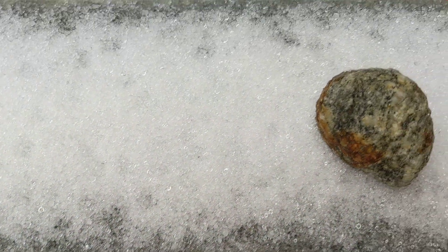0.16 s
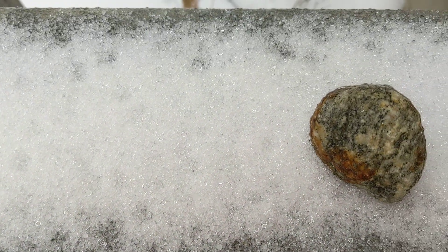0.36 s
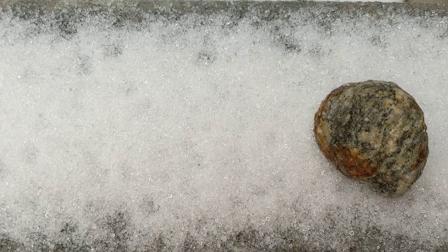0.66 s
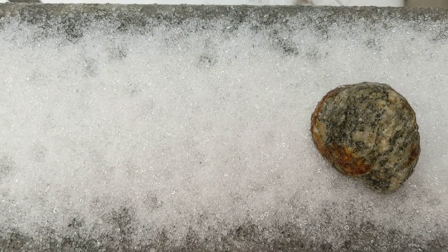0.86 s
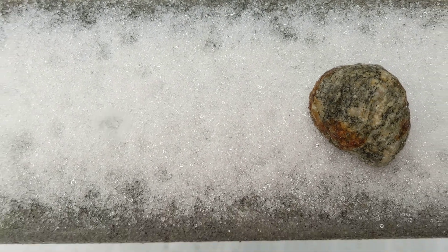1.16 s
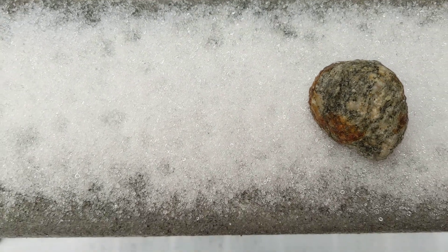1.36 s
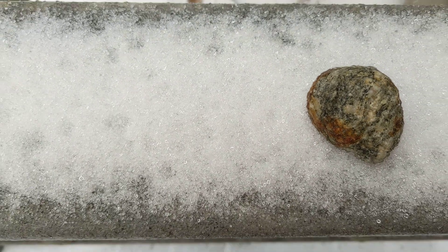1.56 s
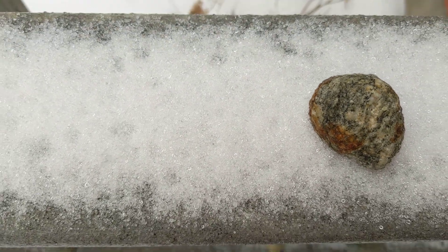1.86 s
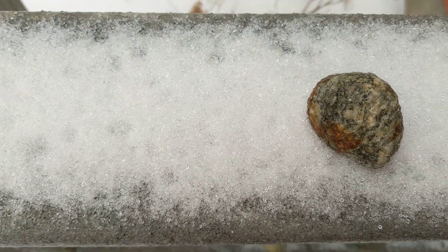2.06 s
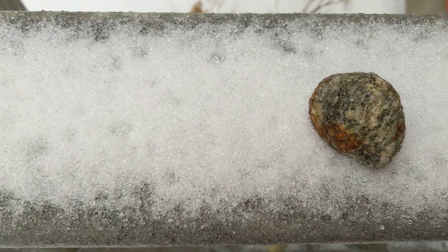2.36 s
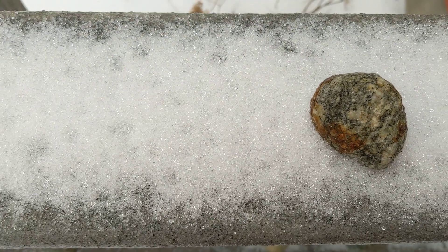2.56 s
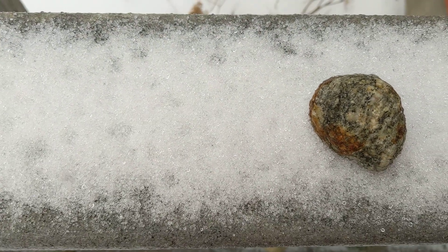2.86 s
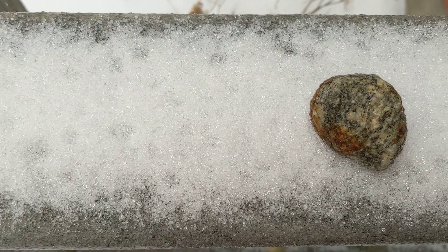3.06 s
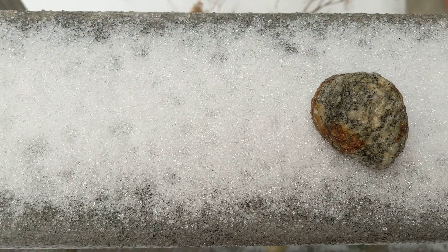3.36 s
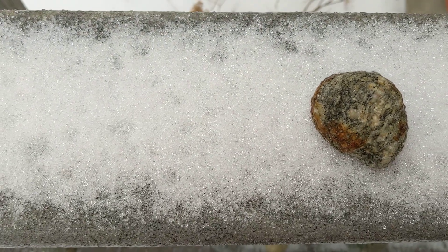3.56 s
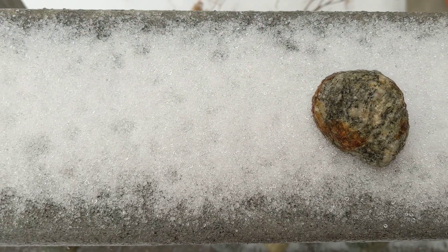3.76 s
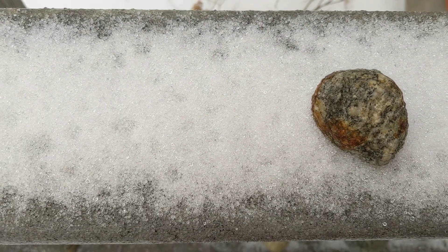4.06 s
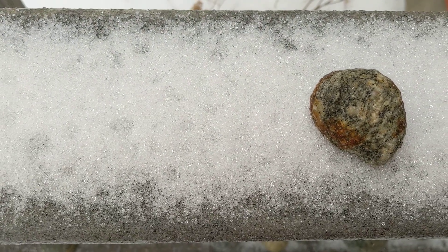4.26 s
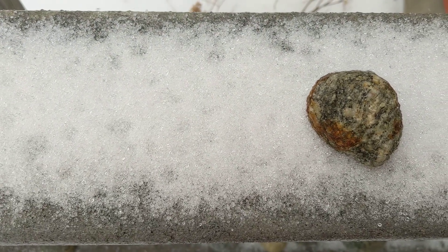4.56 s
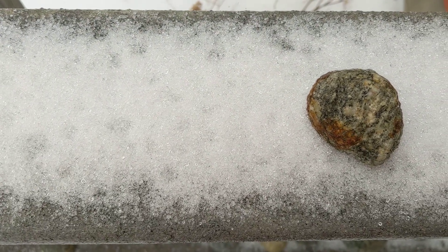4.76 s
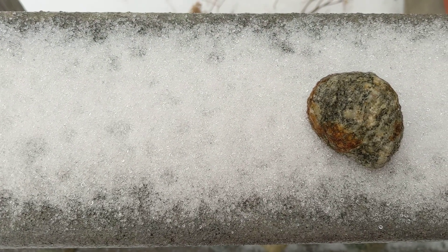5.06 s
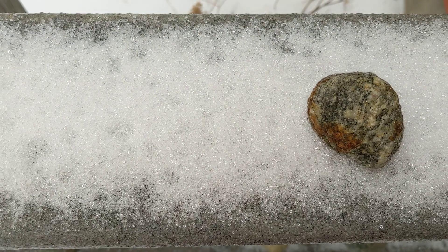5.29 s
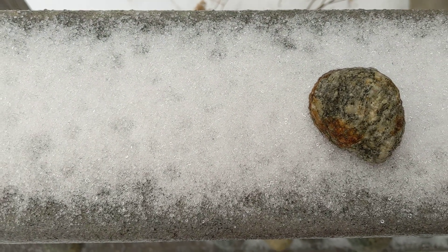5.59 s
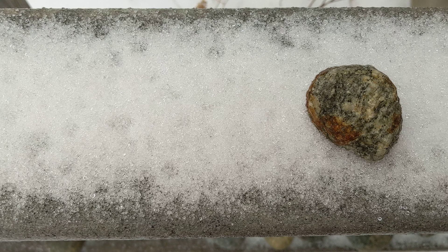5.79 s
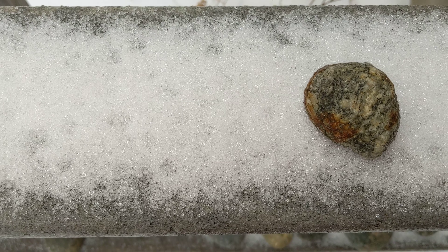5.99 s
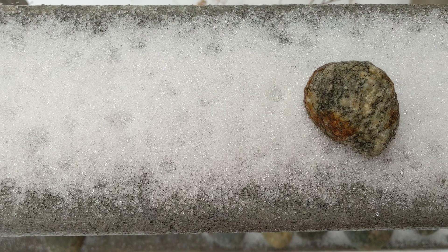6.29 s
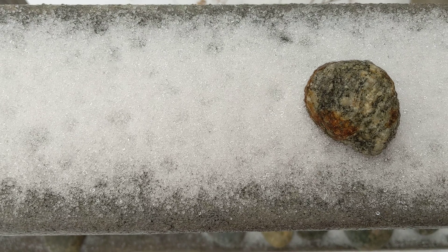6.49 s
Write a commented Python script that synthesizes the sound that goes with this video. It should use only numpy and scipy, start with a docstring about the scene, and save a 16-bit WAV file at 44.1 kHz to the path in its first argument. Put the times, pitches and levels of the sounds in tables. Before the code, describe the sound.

A soft, high hiss of ice pellets pattering on crusted snow runs throughout, outdoors among trees. Crisp clicks and small knocks stand out as pellets hit the microphone, thickest early on, when several also thump. A few tap dryly on twigs. Underneath, far traffic rumbles quietly and an engine's low hum slowly grows, joined late by soft puffs of wind.

```python
"""Sleet falls in snowy woods: countless ice pellets hiss and tick on the crust, and a few tap twigs.
Some strike the camera itself: they click in its microphone ports (the small sound holes), knock its
case and, when heavy, push the diaphragms (the thin skins that sense sound) with a dull thump.
A far engine draws nearer and hums over the rumble of a road; light air stirs at the microphone."""
import sys
import numpy as np
from scipy.fft import rfft, irfft, next_fast_len
from scipy.io import wavfile
from scipy.ndimage import map_coordinates

SR = 44100
rng = np.random.default_rng(int(sys.argv[2]) if len(sys.argv) > 2 else 0)


def transcribe(signal):
    """Save signal, clipped to [-1, 1], as a 16-bit WAV file at the path in sys.argv[1]."""
    frames = np.atleast_2d(signal).T
    limited = np.clip(frames, -1, 1)
    pcm = np.round(limited * 32767).astype(np.int16)
    wavfile.write(sys.argv[1], SR, pcm)


N = 292383
TOP_HZ = 15780  # the highest pitch the camera picks up


# tone of the sleet's hiss: f/Hz, relative level/dB
HISS_TONE = [(500, -8), (1100, -8.5), (1900, -9), (2900, -7.5), (4800, -9), (6600, -5.5), (9500, -1),
             (11000, 0.5), (12800, -4.5), (14300, 1.5), (15500, 0.5)]
# pitches where the ports boost the hiss: f/Hz, width/Hz, left boost/dB, right boost/dB
HISS_BOOSTS = [(1224, 165, 2.5, 3.5), (2280, 680, 6, 6.5), (3293, 480, 7.5, 6.5), (4055, 990, 6.5, 7.5),
               (5700, 990, 10, 8.5), (7490, 800, 6, 6), (9560, 830, 5.5, 6.5), (11850, 380, 10, 1.5)]

def sleet(start_db=-45, thicken_s=5.4, thicken_db_per_s=1.2):
    """Far pellets blur into hiss; nearer ones tick in little clusters. Late on, the sleet thickens."""
    def tone_db(f):
        boosts = (np.array([[left], [right]]) * abs(resonance(f, hz, width)) ** 2
                  for hz, width, left, right in HISS_BOOSTS)
        return along(HISS_TONE, f) + sum(boosts)

    level_db = start_db + thicken_db_per_s * np.maximum(seconds() - thicken_s, 0) + 0.79 * wobble(9)
    far = rng.standard_normal((2, N)) * amp(.5 * wobble(30))
    near = patter(per_s=900, scatter_db=4.5, cap_db=13, pitch_hz=7120, fade_cycles=1.4)
    near *= amp(2.55 * wobble(45))
    return amp(level_db) * spread(far + amp(-9) * near, tone_db)


def patter(per_s, scatter_db, cap_db, pitch_hz, fade_cycles):
    """Pellets tick on the crust, each with its own pitch and direction: many small, a few large."""
    when, size, side, tone = rng.random((int(per_s * N / SR), 4)).T[..., None]
    t = np.arange(SR // 400) / SR
    hz = np.minimum(pitch_hz * 2 ** (1.91 * (tone - .5)), TOP_HZ)
    strength = amp(np.minimum(-scatter_db * np.log(1 - size), cap_db))
    ticks = strength * np.sqrt(hz) * np.exp(-hz * t / fade_cycles) * np.sin(2 * np.pi * hz * t)
    samples = (when * N).astype(int) + np.arange(len(t))
    gains = np.cos(np.pi * side), np.sin(np.pi * side)
    pair = [np.bincount(samples.ravel(), (ticks * gain).ravel(), N)[:N] for gain in gains]
    return unit(np.array(pair))


# clear hits on the camera: t/s, left level/dB, right level/dB, treble over mid/dB, knock/dB, ping/dB
CAMERA_HITS = [(0.0704, -23, -46, 7, -44, -2), (0.355, -28.5, -45, 7, -39.5, -9),
               (0.384, -22.5, -52, 9, -43.5, 0), (0.7965, -13, -37, 1.5, -47, 21),
               (0.854, -41, -52, 3, -41, -4), (1.28, -28, -40, 11, -63, -5), (1.399, -45, -29, 10, -46, -6),
               (1.4613, -20, -25, 3.5, -26.5, -21), (1.5684, -9, -29, -9.5, -27.5, 19),
               (1.675, -27.5, -53, 9, -48, -2), (1.9037, -13, -31, 11, -35, -3.5),
               (1.945, -37, -31, 6, -48, -9), (1.956, -25, -44, 7, -60, -7),
               (2.036, -26.5, -43, -2, -55, 6), (2.338, -26.5, -46, 11, -56, 0),
               (2.4143, -23.5, -14, -0.5, -28, -14), (2.5421, -22.5, -16.5, -6, -26.5, -5),
               (2.6848, -29, -29.5, 4, -36, -14), (3.1823, -14.5, -50, 6.5, -47, -7),
               (3.446, -26.5, -48, 8, -54, -4), (4.266, -51, -29, 10, -54, -6),
               (4.384, -45, -33, 14, -59, -6), (5.317, -21.5, -50, 5.5, -47, 0),
               (5.455, -24, -37, 6, -57, 0), (5.4932, -17.5, -45, 2, -52, 28),
               (5.547, -18.5, -49, 11.5, -46, -3), (6.219, -22.5, -47, 11, -51, -1),
               (6.295, -29.5, -48, 8, -48, 2), (6.481, -31, -47, 7, -40.5, -6)]
# pitches at which the air in the ports rings: f/Hz, width/Hz, relative level/dB
PORT_RINGS = [(2150, 2600, -10), (3560, 890, -6.5), (7310, 500, -1), (9520, 540, -6), (11370, 420, -4.5),
              (14300, 840, -8.5)]
# port pitches that ping under a head-on hit: f/Hz, width/Hz, relative level/dB
PORT_PINGS = [(5660, 470, 9), (3680, 420, -42)]
# pitches at which the case rings: f/Hz, width/Hz, relative level/dB
CASE_RINGS = [(460, 300, -1.5), (784, 410, 10.5), (1600, 220, -1)]

def strikes(hits):
    """Each pellet cracks into the ports, sets the air in them ringing and knocks the case."""
    out, t = np.zeros((2, N)), np.arange(SR // 64) / SR
    f = np.fft.rfftfreq(len(t), 1 / SR)
    treble_share = 1 / (1 + (8500 / (f + 1)) ** 8)
    lead = SR // 1000  # samples of room before the click
    for s, left_db, right_db, treble_db, knock_db, ping_db in hits:
        for channel, db in enumerate((left_db, right_db)):
            # one sharp contact, then the grain of ice crumbles
            contact = (t == 0) + .1 * amp(-60 * t / .004) * rng.standard_normal(len(t))
            port = sum(amp(level + rng.standard_normal()) * resonance(f, hz, width)
                       for hz, width, level in PORT_RINGS)
            ping = sum(amp(level + ping_db) * resonance(f, hz, width) for hz, width, level in PORT_PINGS)
            direct = amp(-24) * resonance(f, 8900, 8000) ** 2
            spectrum = rfft(contact) * (port + ping + direct)
            low, high = spectrum * (1 - treble_share), spectrum * treble_share
            balanced = low / np.linalg.norm(low) + amp(treble_db) * high / np.linalg.norm(high)
            click = unit_burst(np.roll(irfft(balanced, len(t)), lead))
            add(out[channel], s - lead / SR, amp(db - 0.88) * click)
        # heavier pellets knock lower
        pitch = np.exp(0.081 * rng.standard_normal() - 0.0047 * (knock_db + 38.0))
        case = sum((-1) ** k * amp(level) * resonance(f, hz * pitch, width)
                   for k, (hz, width, level) in enumerate(CASE_RINGS))
        knock = unit_burst(irfft(-case * resonance(f, 770, 1050), len(t)))
        # the case rocks, so the two ports hear it a moment apart
        add(out[0], s, amp(knock_db + 5.5) * knock)
        add(out[1], s - .0002, amp(knock_db - 12.0) * knock)
    return out


# a typical glancing hit: left level/dB, right level/dB, treble over mid/dB, knock/dB, ping/dB
TYPICAL_GRAZE = (-38, -39, 8.5, -55.5, -4)

def grazes(per_s=3, scatter_db=4):
    """Small pellets brush the camera at random moments, making faint clicks that are never quite alike."""
    count = round(per_s * N / SR)
    when = rng.random(count) * N / SR
    levels = TYPICAL_GRAZE + scatter_db * rng.standard_normal((count, len(TYPICAL_GRAZE)))
    return strikes(np.column_stack([when, levels]))


# heavy pellets jolt the air in the ports: t/s, pressure step, first shove (both plain signed factors)
AIR_JOLTS = [(1.46, -0.14, -0.31), (1.5678, 0.1, 0.14), (1.905, -0.024, -0.053), (2.414, 0.41, 0.24),
             (2.6844, .025, 0.1)]

def thumps(swing_hz=6.47, slowing_s=0.22, leak_s=0.063):
    """A jump in pressure pushes the diaphragms; they swing back, ever slower, as it leaks away."""
    out, t = np.zeros((2, N)), np.arange(SR // 2) / SR
    rise = 1 - 0.79 * np.exp(-t / 0.012) - 0.36 * np.exp(-t / 0.00041)
    swing = rise * np.exp(-t / leak_s) * np.cos(2 * np.pi * swing_hz * t / (1 + t / slowing_s))
    # the jolt first shoves one diaphragm in and the other out
    shove = t / .0003 * np.exp(1 - t / .0003)
    for s, step, push in AIR_JOLTS:
        add(out, s, step * swing * amp([[-1.6], [2.2]]))
        add(out, s - .0005, push * shove * np.array([[.55], [-.8]]))
    return out


# pellets on nearby twigs and dry leaves: t/s, level/dB, f/Hz, time to fade by 60 dB/s
TWIG_TAPS = [(.253, -43, 1640, 0.1), (.702, -41.5, 1940, 0.038), (0.862, -46.5, 1770, 0.033),
             (6.426, -35, 2750, 0.077), (6.427, -18.5, 7240, 0.021)]

def taps():
    """A pellet on a twig or leaf makes a short, dry burst of noise around one pitch."""
    out, t = np.zeros((2, N)), np.arange(SR // 8) / SR
    rise = 1 - np.exp(-t / 0.00083)
    for s, db, hz, fade_s in TWIG_TAPS:
        noise = rng.standard_normal((2, len(t)))
        rustle = unit(filtered(noise, lambda f: resonance(f, hz, hz) ** 2))
        add(out, s, rustle * rise * amp(db - 60 * t / fade_s) * amp([[2.5], [-1.5]]))
    return out


# the engine's hum, then its overtones: multiple of the firing rate, relative level/dB
ENGINE_TONES = [(1, 2), (2, -17.5), (3, -22.5), (4, -23), (5, -26)]

def engine(start_hz=73.6, climb_hz_per_s=0.33, nearest_s=4.12, eased_s=6.3, load_s=5.4):
    """A far engine's firing blurs into a wavering hum; it nears, speeds up a little, then works harder."""
    t = seconds()
    hum_db = np.interp(t, [0, nearest_s, eased_s], [-61.5, -44.5, -46.5])
    overtones_db = -63.5 + 6.5 * np.maximum(t - load_s, 0)  # they swell once it pulls under load
    firing_hz = (start_hz + climb_hz_per_s * t) * (1 + .005 * wobble(7))
    phase = 2 * np.pi * np.cumsum(firing_hz) / SR
    hum, *overtones = [amp(db + 1.9 * wobble(8.7)) * np.sin(round(k) * phase) for k, db in ENGINE_TONES]
    return amp(hum_db) * unit(hum) + amp(overtones_db) * unit(sum(overtones))


# tone of the road's rumble: f/Hz, relative level/dB
RUMBLE_TONE = [(40, -0.5), (85, -2), (120, -6.5), (180, -5), (260, -8), (400, -17.5), (900, -22),
               (2000, -60)]
# tone of the tyres' roar: f/Hz, relative level/dB
TYRE_TONE = [(120, -12), (240, -3), (370, -0.5), (560, -3.5), (800, -8.5), (1050, -12), (1250, -12.5),
             (1800, -21), (3000, -40)]
# vehicles going by: t/s when nearest, level/dB, time to fall to half power/s
VEHICLES = [(.2, -57.5, 0.1), (5.7, -54.5, 1.52)]

def road(rumble_db=-57, far_tyres_db=-61):
    """Distant traffic rumbles evenly; each passing vehicle's tyres roar louder as it comes closer."""
    passing_power = sum(amp(db) ** 2 / (1 + ((seconds() - s) / width) ** 2) for s, db, width in VEHICLES)
    tyre_gain = np.sqrt(amp(far_tyres_db) ** 2 + passing_power) * amp(wobble(4.3))
    rumble = spread(rng.standard_normal((2, N)), lambda f: along(RUMBLE_TONE, f))
    roar = spread(rng.standard_normal((2, N)), lambda f: along(TYRE_TONE, f))
    return amp(rumble_db + 0.97 * wobble(2.09)) * rumble + tyre_gain * roar


# tone of air moving past the ports: f/Hz, relative level/dB
AIR_TONE = [(8, -16), (20, -9), (45, -1), (70, 0), (120, -22.5), (300, -52)]
# soft puffs of air: t/s, peak level/dB
AIR_PUFFS = [(5.5, -42.5), (5.6, -46), (6.28, -40.5), (6.6, -49)]

def breeze(start_db=-60.5, grow_db_per_s=2, rise_s=0.036, fall_s=0.052):
    """A light, growing draught rumbles at the microphone; soft puffs rise quickly and die away."""
    t = seconds()
    draught = amp(start_db + grow_db_per_s * t)
    puffs = sum(amp(db) * np.exp(-np.maximum((s - t) / rise_s, (t - s) / fall_s)) for s, db in AIR_PUFFS)
    flow = (draught + puffs) * amp(3.4 * wobble(13))
    return flow * spread(rng.standard_normal((2, N)), lambda f: along(AIR_TONE, f))


# how much louder the left side is than the right: f/Hz, level/dB
LEFT_LEAN = [(100, 2), (250, 2), (500, 3.5), (1800, 2.5), (5000, 2.5), (9500, 3.5), (15000, 5.5)]
# how alike the two sides are: f/Hz, likeness (0 unrelated, 1 the same)
SIDE_LIKENESS = [(60, 0.97), (150, 0.9), (270, 0.68), (450, 0.094), (1200, 0.13), (15000, 0)]

def spread(pair, tone_db):
    """Turn two unrelated signals into stereo sound of strength 1 and a given tone, alike in the bass."""
    angle = lambda f: np.arccos(np.clip(along(SIDE_LIKENESS, f), -1, 1)) / 2
    mid, side = filtered(pair, lambda f: np.array([np.cos(angle(f)), np.sin(angle(f))]))
    stereo = np.array([mid + side, mid - side])
    lean_db = lambda f: along(LEFT_LEAN, f) * np.array([[.5], [-.5]])
    return unit(filtered(stereo, lambda f: amp(tone_db(f) + lean_db(f))))


def seconds():
    """The time of every sample."""
    return np.arange(N) / SR


def amp(db):
    """Turn decibels into a factor to multiply by."""
    return 10 ** (np.asarray(db) / 20)


def unit(x):
    """Scale a sound to an average strength (rms) of 1."""
    return x / np.sqrt(np.mean(x ** 2) + 1e-20)


def unit_burst(x):
    """Scale a short sound to the energy of one millisecond at strength 1."""
    return x / np.sqrt(np.sum(x ** 2) / (SR / 1000))


def along(points, hz):
    """Read between the rows of a (f/Hz, value) table, on a log frequency scale."""
    f, values = np.transpose(points)
    return np.interp(np.log(hz + 1), np.log(f + 1), values)


def wobble(per_s):
    """A smooth curve through per_s random points a second."""
    points = rng.standard_normal(int(N * per_s / SR) + 4)
    return map_coordinates(points, [np.arange(N) * per_s / SR])


def filtered(x, response):
    """Multiply each frequency f in a sound by response(f)."""
    n = x.shape[-1]
    padded = next_fast_len(n + min(n, SR // 2))
    return irfft(rfft(x, padded) * response(np.fft.rfftfreq(padded, 1 / SR)), padded)[..., :n]


def resonance(f, hz, width):
    """A ringing filter: it lets hz through fully and weakens pitches on either side."""
    return 1j * f * width / (hz * hz - f * f + 1j * f * width)


def add(track, s, sound):
    """Mix a sound into the track from time s on."""
    start = max(round(s * SR), 0)
    part = track[..., start:start + sound.shape[-1]]
    part += sound[..., :part.shape[-1]]


def scene():
    """Sleet all around and on the camera, over the low background."""
    return sleet() + strikes(CAMERA_HITS) + grazes() + thumps() + taps() + engine() + road() + breeze()


def record(dry):
    """The camera cuts off the very highest pitches."""
    return filtered(dry, lambda f: np.clip((TOP_HZ - f) / 300 + .5, 0, 1))


dry = scene()
out = record(dry)
transcribe(out)
```